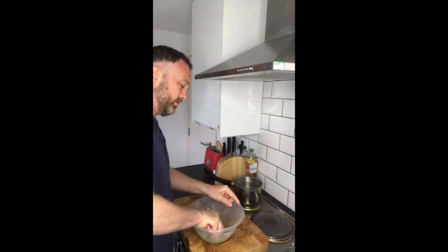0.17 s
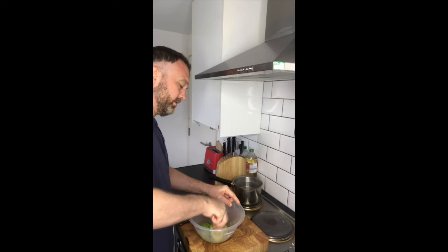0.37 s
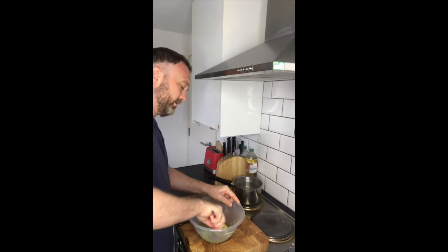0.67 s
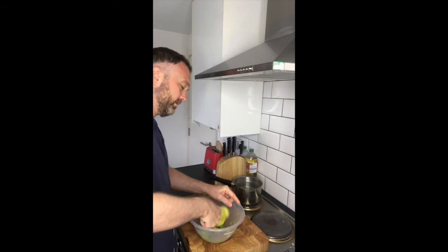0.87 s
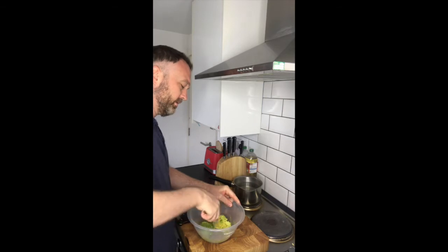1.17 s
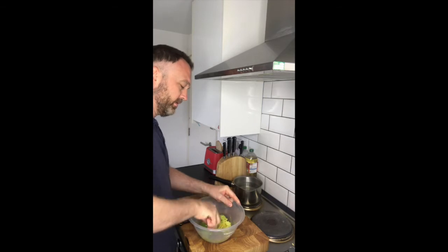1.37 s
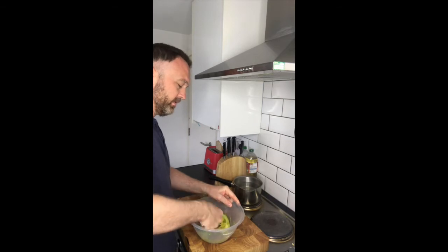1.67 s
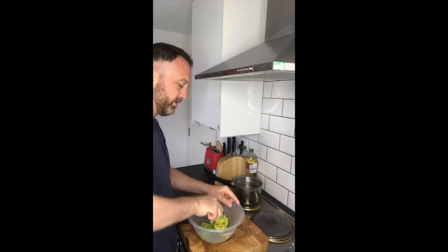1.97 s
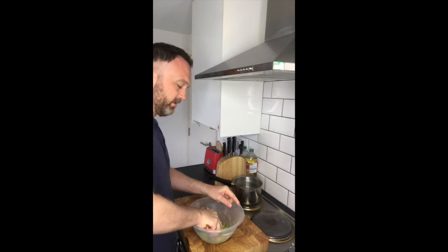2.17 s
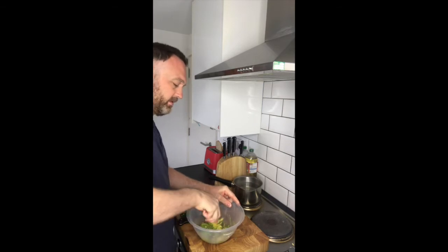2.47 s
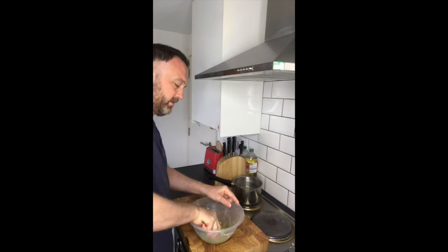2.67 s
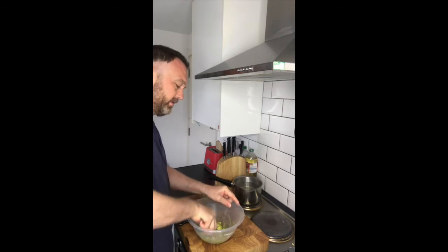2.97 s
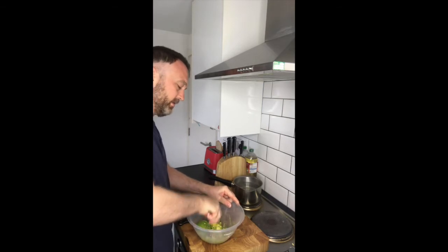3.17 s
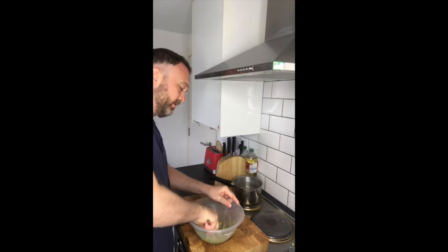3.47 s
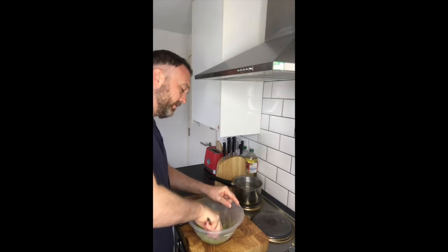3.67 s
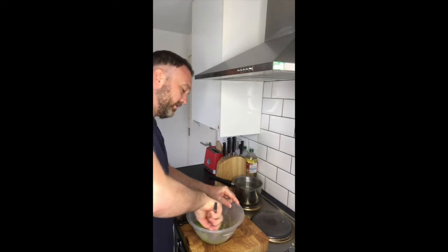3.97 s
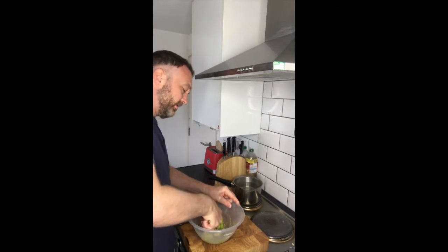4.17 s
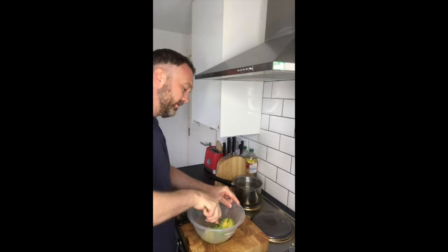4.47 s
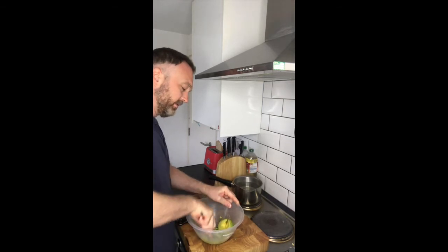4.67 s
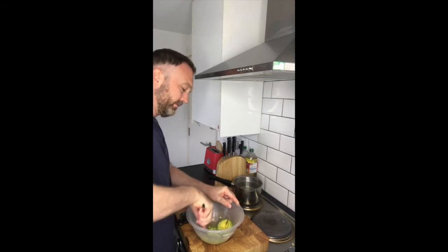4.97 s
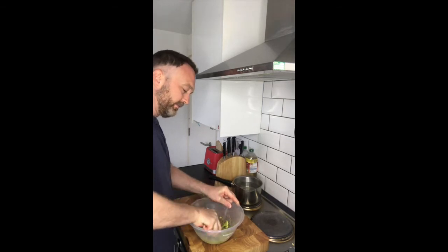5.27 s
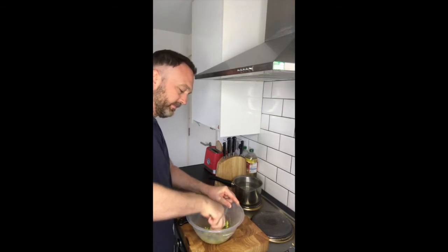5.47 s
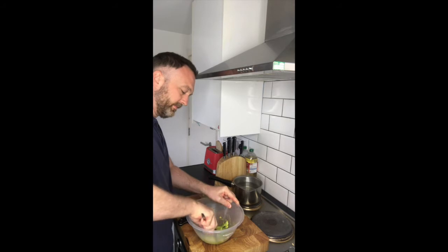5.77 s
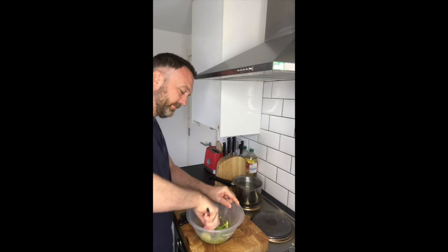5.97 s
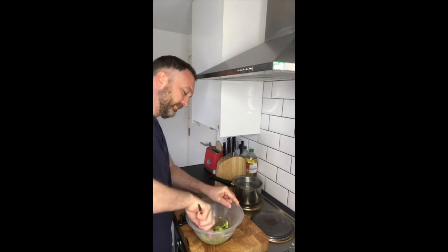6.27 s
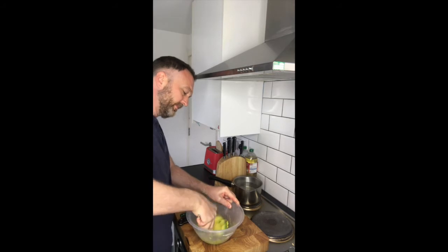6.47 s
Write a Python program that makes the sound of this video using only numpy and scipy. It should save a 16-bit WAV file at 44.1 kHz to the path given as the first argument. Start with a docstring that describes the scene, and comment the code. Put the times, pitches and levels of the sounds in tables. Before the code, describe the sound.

Irregular fork taps, wet short scrapes and dull bowl knocks on a wooden board, one loud thump late on, in a quiet hard-walled kitchen.

```python
"""Soft thuds and bright clicks open close together: a fork mashes avocado in a plastic bowl in a tiled kitchen.
Knocks are band-passed impulses: the bowl hits its wooden board, bounces and hums, and the worktop booms in noise.
Clicks are smeared impulses ringing the wall, tines and body; scrapes drive the same modes with gritty friction noise.
Echoes and a banded noise tail stand for the hard surfaces; board rumble and still air lie underneath."""
import sys
import numpy as np
from scipy import signal
from scipy.fft import rfft, irfft
from scipy.io import wavfile

SR = 44100
rng = np.random.default_rng(int(sys.argv[2]) if len(sys.argv) > 2 else 0)


def generate_wav(sig):
    """Save sig (samples, or channels by samples) to the path in sys.argv[1] as 16-bit PCM at SR."""
    pcm = np.round(np.clip(np.atleast_2d(sig).T, -1, 1) * 32767).astype(np.int16)
    wavfile.write(sys.argv[1], SR, pcm)


N = 291501
HIT_SIZE = 4096  # samples in one blow

# Dull knocks of the bowl: fork landings, a rebound and soft bumps of the board; before the trims in knocks():
# start_s [s], body_db [dB], edge_db [dB re body], boom_db [dB], thud_hz [Hz]
KNOCKS = [(0.013, -52.5, -4.5, -64, 264), (0.038, -38, -11.5, -54, 310), (0.27, -55.5, -9, -83, 295),
          (0.601, -53, -15, -70, 275), (0.84, -60, 0, -71, 188), (1.604, -49.5, 4.5, -61, 203),
          (2.056, -43, -22, -55, 213), (2.36, -55.5, -2, -63.5, 182), (2.595, -36.5, -8.5, -50, 253),
          (3.151, -65, 4, -62.5, 172), (3.195, -58, -6, -73, 347), (3.443, -60, -14, -73, 390),
          (3.655, -39.5, -1.5, -52.5, 283), (3.793, -40.5, -26, -60, 306), (3.901, -45, -20, -78, 332),
          (4.467, -66.5, 1, -61, 236), (4.618, -26, -12.5, -50, 383), (4.695, -46, 3, -51.5, 358),
          (4.769, -38, -13, -64, 310), (4.886, -38, -4, -48, 310), (5.198, -53, -6, -77, 354),
          (6.211, -41.5, -11, -58, 293), (6.236, -54, -23, -60, 285), (6.546, -49, -9, -61, 292)]
# Tines meeting the bare wall, and one faint squeak at 1.026 s; before the trims in clicks():
# start_s [s], wall_db [dB], tine_db [dB re wall], body_db [dB re wall], spot_hz [Hz]
CLICKS = [(0.029, -60, 5.5, 7, 3200), (0.062, -42, -7, -8, 1700), (0.346, -69, 12, -12, 3290),
          (0.603, -56.5, -17.5, -13, 2200), (0.801, -57.5, -10, -9, 1290), (0.86, -57.5, -7.5, -8, 2940),
          (1.026, -66, -6, -14, 4290), (1.46, -49, -9.5, -25, 2210), (1.584, -49.5, -7, -3.5, 3280),
          (1.6036, -35.5, -18, -7.5, 2150), (2.089, -44.5, -4.5, -15, 2100), (2.628, -52.5, -8.5, 0, 1960),
          (2.922, -56.5, -4, -2.5, 2260), (2.9453, -41, -5.5, -14, 1350), (3.264, -47, -8.5, -12, 2540),
          (3.4553, -37.5, -8, -13.5, 3160), (3.667, -35, -4.5, -16, 2170), (3.898, -46, -5.5, -7, 2170),
          (4.11, -43.5, -9.5, -11, 2620), (4.463, -62, 3, -28, 3900), (4.6167, -34.5, -12.5, 2.5, 1210),
          (4.627, -34, -7.5, -6, 2760), (4.882, -44, -7, -10, 1890), (5.051, -52.5, -28, -3, 1495),
          (5.197, -47, -3.5, -2.5, 1965), (5.7849, -36, -6.5, -5.5, 3160), (6.21, -38, -7.5, -28, 3400),
          (6.332, -44, -8, -1, 2000), (6.547, -50, -14.5, -33, 2140)]
# Resonances of the bowl's body: pitch_hz [Hz], width_hz [Hz], level_db [relative dB]
BODY_MODES = [(307, 227, -3), (597, 154, 0.5), (827, 93, -3)]
# Resonances of the steel tines: pitch_hz [Hz], width_hz [Hz], level_db [relative dB]
TINE_MODES = [(5490, 810, 2), (6554, 1190, 2), (8370, 2030, -5.5), (10700, 8900, -16), (14000, 4500, -13.5)]


def from_db(db):
    """Turn decibels into an amplitude factor."""
    return 10 ** (np.asarray(db) / 20)


def rms_one(x):
    """Scale a sound to rms 1."""
    return x / np.sqrt(np.mean(x ** 2) + 1e-20)


def attack_one(x, span_s):
    """Scale a blow so that its first moments have rms 1."""
    return x / np.sqrt(np.mean(x[:int(span_s * SR)] ** 2) + 1e-20)


def at_hz(points, hz, column=1):
    """Read a spectrum on a log-frequency axis."""
    points = np.array(points)
    return np.interp(np.log(np.maximum(hz, 1)), np.log(points[:, 0]), points[:, column])


def add(track, start_s, sound):
    """Mix a sound into a track at a time in seconds."""
    start = max(int(start_s * SR), 0)
    track[start:start + len(sound)] += sound[:max(N - start, 0)]


def band(x, low_hz, high_hz):
    """A gentle band-pass; narrow ones ring like a damped mode."""
    return signal.lfilter(*signal.butter(2, [low_hz, high_hz], "band", fs=SR), x + 1e-18)


def air():
    """Still air: the steady hush of the room, as noise coloured by a fixed spectrum."""
    # Colour of the hush: pitch_hz [Hz], level_db [relative dB per Hz]
    hush = [(12, -38), (20, -5), (54, -2.5), (245, -1), (427, -6.5), (614, -7.5), (906, -8.5), (3170, -18),
            (4950, -22.5), (6360, -23.5), (10500, -29), (14300, -28), (15500, -37)]
    colour = from_db(at_hz(hush, np.arange(N // 2 + 1) * SR / N))
    return from_db(-67) * rms_one(irfft(rfft(rng.standard_normal(N)) * colour, N))


def board():
    """The board rocks and rumbles after each knock, and while the steadying hand shifts the bowl near the end."""
    rock_db, rock_rise_s, rock_t60_s = -1, 0.072, 1.46  # dB re boom setting
    shift_s, shift_rise_s, shift_db = 5.58, 0.23, -61
    t = np.arange(N) / SR
    power = (from_db(shift_db) * np.clip((t - shift_s) / shift_rise_s, 0, 1)) ** 2
    rocking = (1 - np.exp(-t / rock_rise_s)) * from_db(-60 * t / rock_t60_s)
    for start_s, _, _, boom_db, _ in KNOCKS:
        add(power, start_s, (from_db(boom_db + rock_db) * rocking) ** 2)
    rumble = rms_one(band(rng.standard_normal(N), low_hz=36.3, high_hz=57.4))
    return np.sqrt(power) * rumble


def kitchen(x, build_s):
    """Hard surfaces return distinct echoes, then a diffuse tail that dies band by band."""
    # Early returns from worktop and tiles: delay_s [s], level_db [dB re direct]
    echoes = [(.0031, -21), (.0056, -13)]
    # Diffuse tail: pitch_hz [Hz], t60_s [s], level_db [relative dB, before band filtering]
    tail = [(60.7, 0.88, -11), (147, 0.89, -8), (326, 0.38, -7), (604, 0.57, -2.5), (990, 0.48, -2),
            (2920, 0.54, -5), (7350, 0.52, -3.5), (15300, 0.12, -0.5)]
    t = np.arange(SR) / SR
    response = np.zeros(SR)
    edges_hz = np.geomspace(40, 17000, 15)
    for low_hz, high_hz in zip(edges_hz, edges_hz[1:]):
        hz = np.sqrt(low_hz * high_hz)
        decay = from_db(-60 * t / at_hz(tail, hz)) * (1 - np.exp(-t / build_s))
        gain = from_db(at_hz(tail, hz, column=2)) / np.sqrt(np.sum(decay ** 2))
        response += gain * decay * band(rng.standard_normal(SR), low_hz, high_hz)
    for delay_s, level_db in echoes:
        response[int(delay_s * SR)] += from_db(level_db)
    return x + signal.fftconvolve(x, response)[:N]


def worktop(rise_s, t60_s, low_hz, high_hz):
    """The worktop and cupboard take up a blow slowly and boom on."""
    t = np.arange(SR) / SR
    boom = rms_one(band(rng.standard_normal(SR), low_hz, high_hz))
    return attack_one(boom * (1 - np.exp(-t / rise_s)) * from_db(-60 * t / t60_s), span_s=0.13)


def rim_ring():
    """The free rim of the bowl hums on after a knock, as slowly swelling, decaying sines."""
    # Rim tones: pitch_hz [Hz], level_db [dB re knock, before the swell], t60_s [s]
    rim_tones = [(516, -15, 0.35), (579, -6, 0.24), (638, -37, 0.57)]
    t = np.arange(SR // 2) / SR
    tones = sum(from_db(db - 60 * t / t60_s) * np.sin(2 * np.pi * hz * t) for hz, db, t60_s in rim_tones)
    return tones * (1 - np.exp(-t / 0.018))


def contact(echo, lap_s):
    """One sharp push whose bending waves run round the bowl and return, spreading it in time but not in colour."""
    force = signal.unit_impulse(HIT_SIZE)
    for lap in (rng.uniform(.25, 1, size=4) * lap_s * SR).astype(int):
        loop = np.r_[1, np.zeros(lap), -echo]
        force = signal.lfilter(loop[::-1], loop, force)  # all-pass
    return force


def knocks():
    """Dull blows thud the bowl into the board, with a harder edge, and set rim and worktop going."""
    # The bowl meets the board, then rebounds: delay_s [s], level_db [dB re blow]
    bounces = [(.0012, 0.5), (.0132, -7), (.0262, -14.5), (.0395, -9)]
    bowl, boom = np.zeros(N), np.zeros(N)
    push = signal.unit_impulse(HIT_SIZE)
    for start_s, body_db, edge_db, boom_db, thud_hz in KNOCKS:
        body = attack_one(band(push, low_hz=491, high_hz=679), span_s=0.0078)  # swells over a few cycles
        thud = attack_one(band(push, thud_hz * 0.73, thud_hz * 1.31), span_s=0.01)
        blow = from_db(body_db) * (from_db(-1) * body - from_db(-5.5) * thud)
        for delay_s, level_db in bounces:
            add(bowl, start_s + delay_s, from_db(level_db) * blow)
        edge = band(contact(echo=0.62, lap_s=0.0018), low_hz=660, high_hz=2600)
        add(bowl, start_s, from_db(body_db + edge_db - 4.5) * attack_one(edge, span_s=0.012))
        add(bowl, start_s, from_db(body_db) * rim_ring())
        add(boom, start_s, from_db(boom_db) * worktop(rise_s=0.0072, t60_s=0.69, low_hz=51, high_hz=127.4))
    return bowl, boom


def wall_modes(tine_db):
    """Modes of the bowl's wall; pulp that mutes the tines also softens the upper ones."""
    # Resonances of the wall: pitch_hz [Hz], width_hz [Hz], level_db [relative dB, before the tilt]
    wall = [(1265, 510, -5), (1888, 447, -1), (2307, 363, -1), (2920, 770, -0.5), (3657, 520, -5),
            (4260, 795, -5.5)]
    db_per_octave = 0.7 * (tine_db + 8.5)
    return [(hz, width, db + db_per_octave * np.log2(hz / wall[0][0])) for hz, width, db in wall]


def slips(size, per_s, spread_db, smear, catch_db, catch_s):
    """Friction: tiny uneven slips over the hiss of smeared pulp, in clumps as the tines catch and slide."""
    sizes = from_db(spread_db * np.minimum(rng.exponential(1, size), 3))
    signed = sizes * rng.choice([-1, 1], size)
    grains = rms_one(signed * (rng.random(size) < per_s / SR))
    hiss = smear * rng.standard_normal(size)
    grip = np.interp(np.arange(size) / SR / catch_s, np.arange(size), rng.uniform(-0.92, 1, size))
    return (grains + hiss) * from_db(catch_db * grip)


def trim_top(force, cut_hz):
    """A very high, gentle low-pass barely touches the top of each slip."""
    return signal.lfilter(*signal.butter(1, cut_hz, fs=SR), force)


def travel(force, modes):
    """Moving tines pass the nodes of each mode, so the modes swell and sink one by one; rms 1."""
    node_db, node_s = 5.5, 0.01175  # typical swing; time between swings
    steps = np.arange(len(force)) / SR / node_s
    swings = rng.standard_normal((len(modes), 64))
    out = np.zeros(len(force))
    for k, ((hz, width, db), swing) in enumerate(zip(modes, swings)):
        swell_db = node_db * np.interp(steps, np.arange(len(swing)), swing)
        mode = band(force, hz - width / 2, hz + width / 2)
        out += (-1) ** k * from_db(db + swell_db) * mode
    return rms_one(out)


def drag(length_s, wall_db, tine_db, rise_share):
    """One drag presses harder up to its crest, then lets go; the bowl's body groans even under a light one."""
    ends_db = -15.5  # pressure at both ends, re crest
    groan_db, groan_follows, middling_db = -60.5, 0.42, -52  # groan follows the stroke in dB per dB
    t = np.arange(3 * HIT_SIZE) / SR
    pressure = from_db(np.interp(t / length_s, [0, rise_share, 1], [ends_db, 0, ends_db])) * (t < length_s)
    force = slips(len(t), per_s=1800, spread_db=2.5, smear=0.32, catch_db=4, catch_s=0.00403)
    force = trim_top(force, cut_hz=0.45 * SR)
    body_db = groan_db + groan_follows * (wall_db - middling_db)
    parts = ((wall_modes(tine_db), wall_db - .3), (TINE_MODES, wall_db + tine_db - .6), (BODY_MODES, body_db))
    return pressure * sum(from_db(db) * travel(force, modes) for modes, db in parts)


def scrapes():
    """Tines stroke the wall through the pulp, with a faint skid around each click, strongest just after it."""
    # Strokes, levels before the trims in drag():
    # crest_s [s], length_s [s], wall_db [dB], tine_db [dB re wall]
    strokes = [(0.162, 0.092, -57, -12.5), (0.287, 0.17, -65.5, -9.5), (0.678, 0.2, -72, -1),
               (.852, 0.069, -54.5, -9), (1.429, 0.26, -69.5, -5.5), (1.621, .07, -54, -16),
               (2.057, 0.046, -56, -1), (2.301, 0.12, -55.5, -12), (2.649, 0.057, -48, -15.5),
               (2.748, 0.087, -49, -6.5), (3.021, 0.07, -45, -7), (3.206, 0.067, -61.5, -0.5),
               (3.279, 0.045, -44.5, -7.5), (3.506, .11, -44, -8), (3.943, 0.071, -48.5, -6.5),
               (4.029, 0.079, -40.5, -6.5), (4.074, .14, -46, -7), (4.694, .04, -45.5, -12),
               (4.911, 0.061, -48.5, -8.5), (5.18, 0.096, -65.5, 1), (5.293, 0.13, -64, -12),
               (5.44, 0.2, -66, -1.5), (5.852, 0.23, -63, -8), (5.954, 0.087, -49.5, -19.5),
               (6.293, 0.1, -59, -0.5), (6.415, 0.093, -50, -6)]
    skid_db, crest_delay_s, skid_length_s = -22, 0.037, .09  # dB re click
    rise_share = .55  # part of a stroke spent pressing harder
    skids = [(start_s + crest_delay_s, skid_length_s, wall_db + skid_db, tine_db)
             for start_s, wall_db, tine_db, _, _ in CLICKS]
    out = np.zeros(N)
    for crest_s, length_s, wall_db, tine_db in [*strokes, *skids]:
        add(out, crest_s - rise_share * length_s, drag(length_s, wall_db, tine_db, rise_share))
    return out


def favour(modes, spot_hz, boost_db, octaves):
    """The spot that is struck brings out the modes near its own pitch."""
    return [(hz, width, db + boost_db * np.exp(-(np.log2(hz / spot_hz) / octaves) ** 2))
            for hz, width, db in modes]


def resonate(force, modes, spread_db):
    """Damped resonances of alternating sign, with practically the same strengths at each contact."""
    out = np.zeros(len(force))
    for k, (hz, width, db) in enumerate(modes):
        strength = from_db(db + spread_db * rng.standard_normal())
        out += (-1) ** k * strength * band(force, hz - width / 2, hz + width / 2)
    return out


def glances(sound):
    """Reflections off the bowl's far side and the hand colour each click anew at about the same power."""
    near_s, far_s, gain = .001, .005, from_db(-11.5)
    out = sound.copy()
    for delay_s in rng.uniform(near_s, far_s, size=3):
        lag = int(delay_s * SR)
        out[lag:] += gain * sound[:-lag]
    return out / np.sqrt(1 + 3 * gain ** 2)


def clicks():
    """Steel on bare plastic: a short dry crack rings the wall, the tines and the bowl's body."""
    out = np.zeros(N)
    for start_s, wall_db, tine_db, body_db, spot_hz in CLICKS:
        force = contact(echo=0.53, lap_s=.0008)
        wall = favour(wall_modes(tine_db), spot_hz, boost_db=6, octaves=0.25)
        parts = ((wall, -.2), (TINE_MODES, tine_db - .5), (BODY_MODES, body_db))
        crack = sum(from_db(db) * attack_one(resonate(force, modes, spread_db=0.07), span_s=0.006)
                    for modes, db in parts)
        add(out, start_s, from_db(wall_db) * glances(crack))
    return out


def scene():
    """Knocks, clicks and scrapes sound in the kitchen, over the boom of the worktop, the board and still air."""
    bowl, boom = knocks()
    sent = from_db(-1.5) * bowl  # the board shields the room from part of each knock
    in_room = kitchen(sent + clicks() + scrapes(), build_s=0.0015)
    unsent = bowl - sent  # heard directly only
    return (unsent + in_room + boom + board() + air())[None]


def record(dry):
    """A steep low-pass cuts the top."""
    return signal.sosfilt(signal.ellip(10, .2, 70, 15900, fs=SR, output="sos"), dry)


dry = scene()
out = record(dry)
generate_wav(out)
```